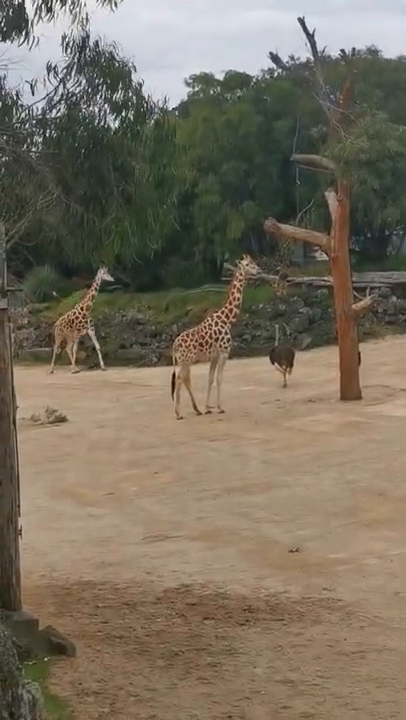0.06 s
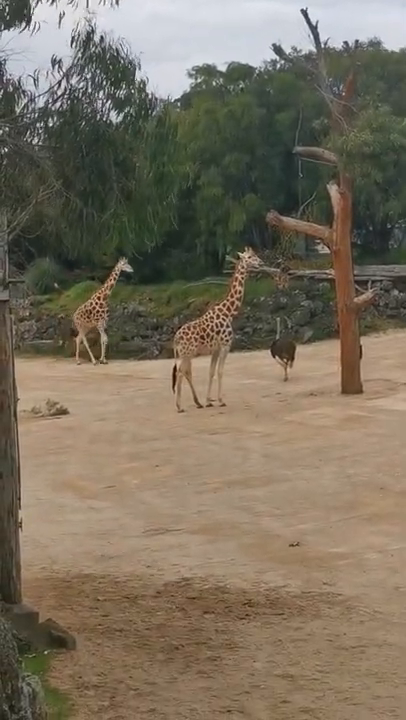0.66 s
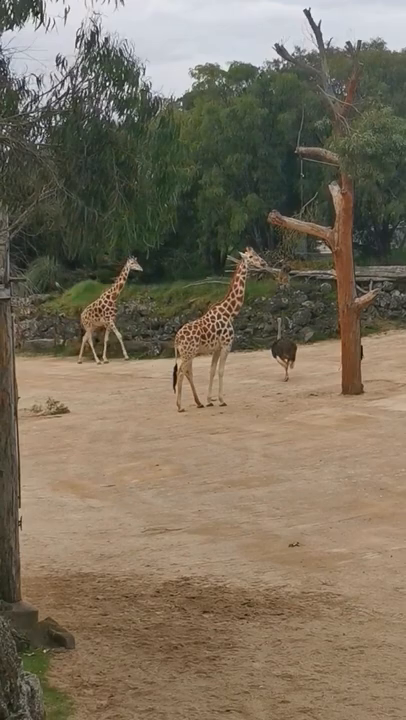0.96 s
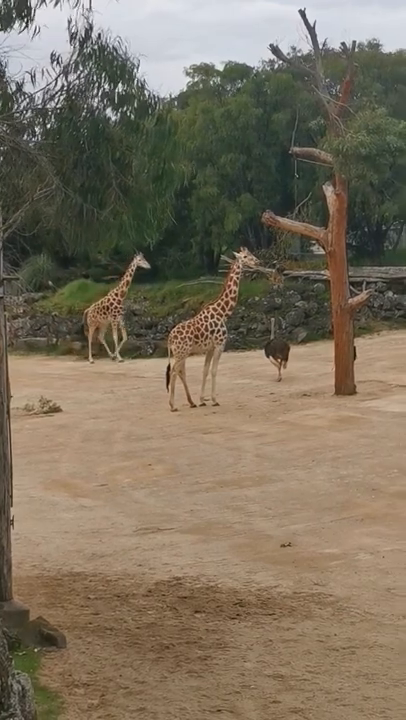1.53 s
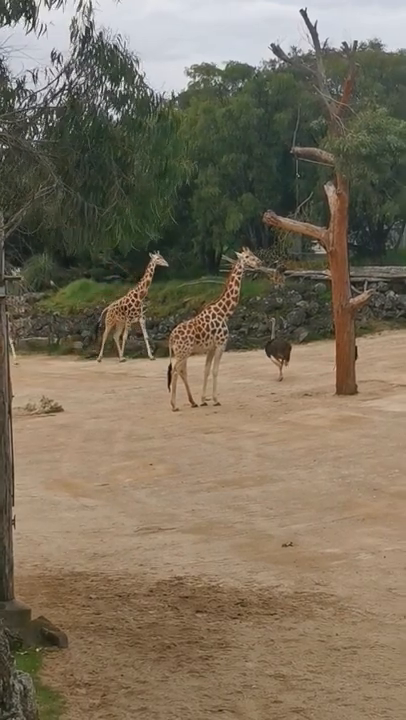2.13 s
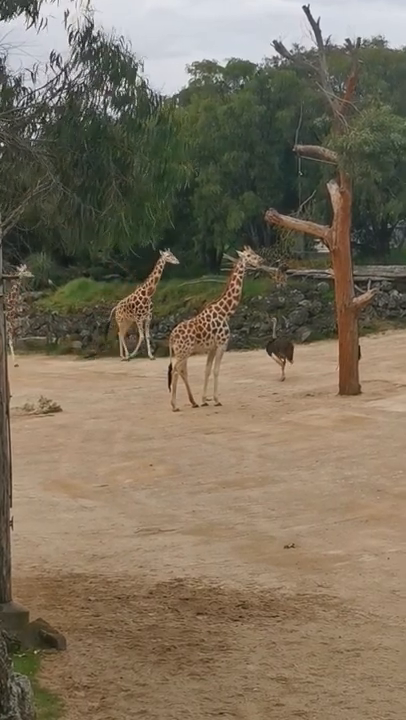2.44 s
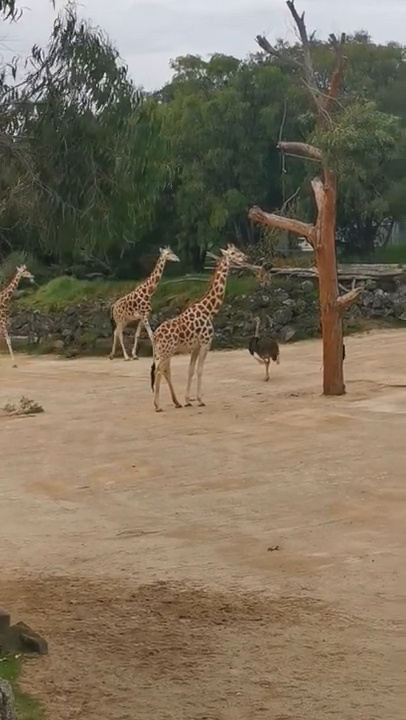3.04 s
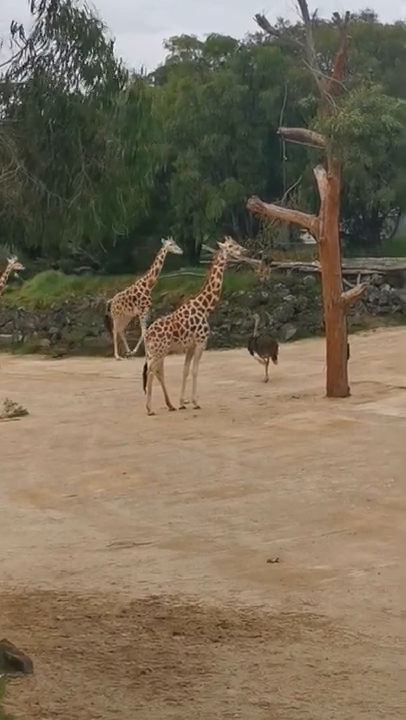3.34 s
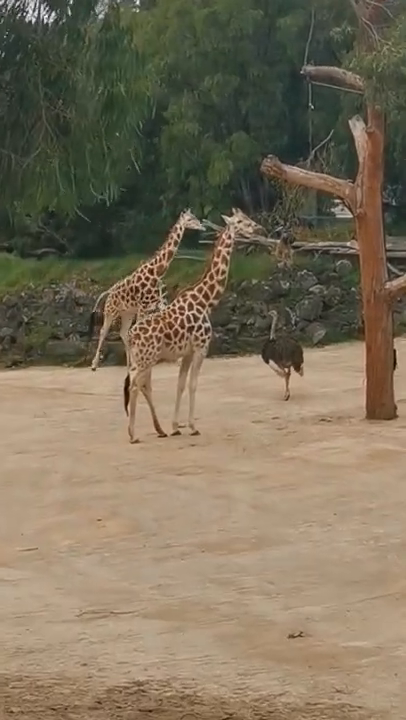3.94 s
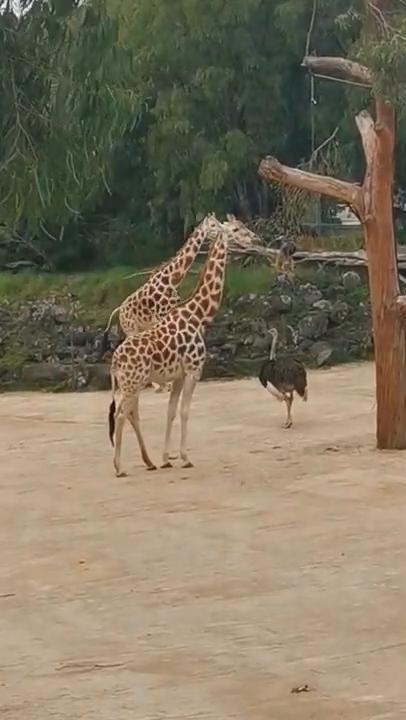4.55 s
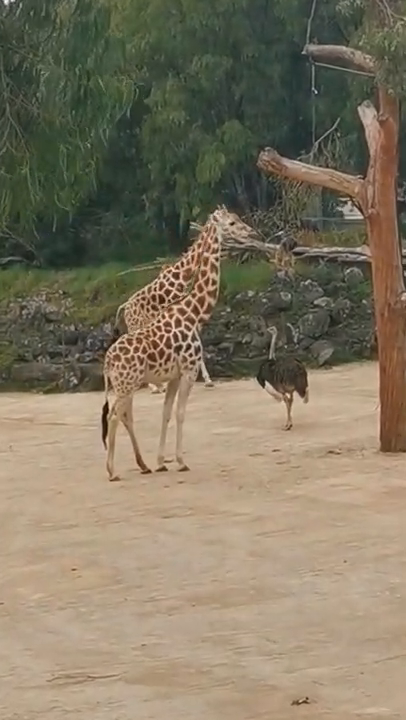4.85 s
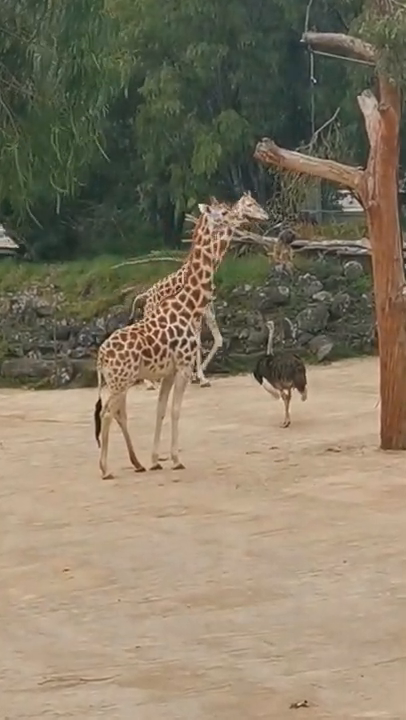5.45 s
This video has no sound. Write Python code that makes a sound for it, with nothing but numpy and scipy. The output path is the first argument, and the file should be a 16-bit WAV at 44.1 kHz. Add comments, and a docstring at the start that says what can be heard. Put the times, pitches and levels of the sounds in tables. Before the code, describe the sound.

A finch trills into a loud flourish and other birds answer, with a distant cooing dove and low outdoor rumble.

```python
"""Birds sing round an open animal paddock, over a low rumble, a faint machine hum and a soft high hiss.
First a dove coos far off and a distant bird repeats a rising whistle, with a few faint scuffs close by.
Then a finch runs through three trills into a loud flourish. Another bird answers with thin high notes
and low slurs; near the end a hidden bird chatters and the scuffs return. Each note is a gliding tone,
roughened by the bird's voice box and scattered into echoes by trunks and leaves."""
import sys
import numpy as np
from scipy import signal
from scipy.fft import rfft, irfft, next_fast_len
from scipy.io import wavfile
from scipy.ndimage import map_coordinates

SR = 44100
rng = np.random.default_rng(int(sys.argv[2]) if len(sys.argv) > 2 else 0)


def generate_wav(signal):
    """Clip the signal to [-1, 1] and save it as 16-bit WAV at the path in sys.argv[1]."""
    frames = np.transpose(np.atleast_2d(signal))
    scaled = np.clip(frames, -1, 1) * 32767
    pcm = np.round(scaled).astype(np.int16)
    wavfile.write(sys.argv[1], SR, pcm)


N = 250929
TIME = np.arange(N) / SR

# Tone colour of the rumble, the bass and the background hiss: (frequency [Hz], relative level [dB])
RUMBLE_COLOUR = [(25, -38.5), (60, -46), (100, -27), (220, 1), (350, 10.5), (650, 5), (1000, 2),
                 (1500, -13), (2500, -20.5), (6000, -30.5)]
BASS_COLOUR = [(25, -32), (60, -17), (100, -3), (170, 0), (300, -8), (1000, -50)]
HISS_COLOUR = [(100, -39), (600, -17), (1700, -4.5), (3000, 3), (4800, -0.5), (7000, -14), (14000, -41)]
# How each of them swells and fades: (time [s], relative level [dB])
RUMBLE_LEVELS = [(0, -67.5), (.9, -71.5), (1.5, -69.5), (2.3, -69), (2.8, -69), (3.5, -67), (4.3, -71),
                 (5.69, -69)]
BASS_LEVELS = [(0, -82), (1.1, -81.5), (1.55, -66.5), (1.8, -81), (2.8, -74.5), (3.05, -91), (3.5, -82),
               (5.1, -80.5), (5.69, -68.5)]
HISS_LEVELS = [(0, -77.5), (2.4, -69), (3.1, -60), (3.7, -57), (4.45, -71.5), (5.69, -57)]
# The machine's tones: (pitch [Hz], level [dB])
HUM_TONES = [(96.9, -94.5), (145.3, -102.5), (199.2, -87)]
# Scuffs close by: (time [s], centre frequency [Hz], width [Hz], fade time [s], level [dB])
NEAR_SCUFFS = [(0.064, 8700, 1200, 0.025, -68), (.46, 8000, 7000, 0.028, -80),
               (0.812, 2600, 4850, 0.027, -62.5), (1.082, 855, 895, 0.021, -57),
               (3.981, 10760, 4190, 0.23, -88), (4.147, 10800, 2900, 0.028, -71),
               (4.33, 10800, 4330, 0.024, -62.5), (4.898, 8300, 6070, 0.019, -55)]

# The dove's coos: (time [s], length [s], pitch [Hz], rise [share of pitch], level [dB])
DOVE_COOS = [(0.049, 0.18, 451.7, 0.063, -58), (0.278, 0.092, 443.4, -0.19, -59.5),
             (0.459, 0.19, 402, -0.15, -62), (0.67, 0.048, 362.4, -0.048, -70),
             (1.148, 0.21, 372.2, -0.0047, -63.5), (1.365, 0.2, 390.5, 0.063, -59),
             (1.923, 0.1, 433, 0.31, -59), (2.03, 0.2, 486.7, 0.12, -67.5),
             (2.376, 0.0963, 443.5, -0.28, -60.5), (2.631, 0.14, 444.6, -0.23, -61.5),
             (3.36, 0.12, 440.2, -0.12, -56), (3.73, 0.15, 374, -0.076, -69)]
# The far bird's rising whistles: (time [s], level [dB])
FAR_WHISTLES = [(.075, -86), (.24, -84.5), (0.411, -83), (0.582, -77), (0.758, -79), (0.94, -79.5),
                (1.116, -76.5), (1.303, -77.5), (1.503, -75.5), (1.712, -72.5)]

# A syllable is a tiny group of notes. The hidden bird has one, the finch the other five:
# (delay [s], length [s], start pitch [Hz], middle pitch [Hz], end pitch [Hz], level [dB], rasp [0-1])
CHATTER_NOTES = [(0, .032, 6400, 5850, 5200, -1.5, .6), (0, .038, 5200, 4500, 3900, -1, .7)]
ZIP_NOTES = [(-.032, .034, 2400, 2950, 3550, -11.5, .45), (-.036, .042, 4500, 5400, 7300, -4, .45),
             (-.01, .027, 3600, 5200, 7500, -.5, .4), (.002, .022, 3400, 5000, 6900, -.5, .4)]
CHIP_NOTES = [(-.003, .02, 6900, 5750, 4800, 0, .35), (.012, .024, 5750, 5400, 5050, -3, .35),
              (.008, .024, 4700, 4200, 3600, -5, .55)]
TEW_NOTES = [(0, .028, 4250, 3500, 2950, 0, .75)]
LOOP_NOTES = [(0, .026, 2450, 3050, 3800, .5, .55), (.016, .032, 3550, 4300, 5600, -1.5, .7),
              (.046, .03, 3950, 3920, 3800, -4.5, .25), (.066, .05, 3600, 2650, 1900, -10, .75)]
ARCH_NOTES = [(0, .016, 3400, 3980, 4300, 1.5, .2), (.011, .028, 4300, 4450, 4200, -1, .25),
              (.033, .045, 4150, 3600, 3100, -6.5, .3)]
# When each syllable is sung: (time [s], length [factor], pitch [factor], level [dB])
CHATTER_REPEATS = [(4.385, 0.78, 1, -53.5), (4.486, 1.1, 1, -54.5), (4.596, 0.72, 0.98, -49.5),
                   (4.699, 1.17, 0.95, -45), (4.814, 1.01, 0.95, -43.5), (4.914, 1, 0.96, -45),
                   (5.003, 1, 0.93, -45), (5.11, 1.04, 0.88, -48), (5.21, 1.25, 0.9, -45),
                   (5.309, 1.25, 0.75, -45.5)]
ZIP_REPEATS = [(1.644, 1.2, 0.96, -62.5), (1.754, 1.4, 1, -61.5), (1.841, 0.72, 1, -53),
               (1.952, 0.93, 1, -52.5), (2.051, 1.07, .98, -52)]
CHIP_REPEATS = [(2.12, 1.27, 0.98, -57), (2.205, 0.64, 0.96, -51.5), (2.284, 1.08, 1, -56),
                (2.375, 0.8, 0.99, -48.5), (2.454, 0.86, 0.92, -51.5)]
TEW_REPEATS = [(2.537, 0.83, 1.036, -44.5), (2.608, .95, 1.02, -46.5), (2.67, 0.81, 1.036, -45),
               (2.738, 0.78, 0.94, -50.5), (2.802, 1, .98, -50.5), (2.871, 0.94, 0.96, -50.5),
               (3.387, 0.94, 1.037, -40)]
LOOP_REPEATS = [(2.944, 0.97, 1, -41.5), (3.13, 0.88, 0.99, -42), (3.423, 0.65, 0.95, -42.5)]
ARCH_REPEATS = [(3.678, .95, 0.97, -36.5), (3.828, 1, 0.99, -47.5)]

# The answering bird's whistles:
# (time [s], length [s], pitch [Hz], rise [share of pitch], level [dB], rasp [0-1])
RASPY_WHISTLES = [(4.351, 0.11, 8040, -0.025, -41.5, 0.21), (4.448, 0.022, 7360, -0.13, -37, 0.43),
                  (4.477, 0.021, 6640, -.02, -37, 0.43), (4.561, 0.057, 8270, 0.02, -48, 0.27),
                  (4.604, 0.0327, 8165, -0.023, -39, 0.18), (4.941, 0.039, 6570, 0.032, -33, 0.27),
                  (5.082, 0.04, 8040, -0.021, -46, 0.35), (5.134, 0.037, 7940, 0.075, -43, 0.2),
                  (5.248, 0.032, 6770, 0.13, -38, 0.38), (5.306, 0.042, 7000, -0.04, -37, 0.17)]
PURE_WHISTLES = [(3.6, .45, 5160, -.014, -41.8, .4), (3.983, .045, 3416, -.01, -51, .2),
                 (5.532, .042, 4410, .03, -32.5, .04)]
# Its other calls, and the finch's harsh linking notes: (time [s], length [s], pitch [Hz], level [dB])
UPWARD_SCOOPS = [(4.346, 0.015, 7270, -42.5), (4.559, 0.02, 7370, -47.5), (4.947, 0.012, 6300, -46),
                 (5.074, 0.016, 7360, -47), (5.574, 0.027, 5700, -47)]
LOW_SLURS = [(4.027, 0.091, 2195, -63.5), (4.181, 0.078, 2014, -68), (5.296, 0.025, 2655, -48),
             (5.483, 0.0277, 2887, -46.5), (5.655, 0.034, 2917, -46)]
FALLING_FLICKS = [(2.891, 0.19, 6050, -64.5), (3.363, 0.033, 5850, -58), (4.004, 0.04, 6290, -56),
                  (4.724, 0.017, 6480, -41), (4.838, 0.015, 6570, -43), (5.184, 0.021, 6320, -40),
                  (5.668, .024, 5100, -38)]
SHORT_BUZZES = [(4.46, 0.037, 7900, -67), (5.4, 0.059, 3760, -40), (5.434, 0.073, 5950, -50),
                (5.575, 0.063, 4450, -45), (5.631, 0.047, 5875, -39)]
HIGH_WHEEZES = [(2.861, 0.068, 6830, -63.5), (3.038, 0.17, 7050, -59.5), (3.235, 0.078, 7050, -63),
                (3.385, 0.049, 6960, -57), (4.26, 0.2, 6460, -61.5)]
FINCH_LINKS = [(2.139, 0.026, 3000, -69), (2.84, 0.007, 4800, -56.5), (3.341, 0.011, 4900, -54),
               (3.509, 0.031, 3830, -45.5), (3.546, 0.021, 5380, -53.5), (3.566, 0.06, 4960, -46.5),
               (3.611, 0.046, 3700, -44), (3.651, 0.035, 3300, -40), (3.733, 0.09, 2730, -54)]
# Their shapes: (start pitch [share of middle pitch], end pitch [share of middle pitch], rasp [0-1])
SCOOP_SHAPE, SLUR_SHAPE, FLICK_SHAPE = (.82, 1.04, .3), (1.03, .93, .3), (1.17, .8, .7)
BUZZ_SHAPE, WHEEZE_SHAPE, LINK_SHAPE = (1.05, .98, .8), (1, 1, .35), (1.2, .92, .7)

# The finch starts harsh and grows pure: (time [s], relative hiss level [dB])
FINCH_HARSHNESS = [(1.63, -13), (1.8, -15), (2.05, -20), (2.4, -26), (2.56, -46), (3.7, -50)]
# Tone colour of that hiss: (frequency [Hz], relative level [dB])
FINCH_HISS_COLOUR = [(1000, -20), (4000, -6), (8500, 4), (10500, 3), (12500, -4), (15000, -9)]
# How squarely the finch faces the paddock: (time [s], relative level of the direct sound [dB])
FINCH_FACING = [(1.6, -2.5), (2.05, -2), (2.2, -5.5), (2.45, -5.5), (2.56, -3.2), (3.45, -3), (3.6, -4),
                (3.69, 2.5), (3.9, 4.5)]
# Where the finch is heard: (time [s], left minus right [dB])
FINCH_POSITION = [(1.9, -7), (2.6, -2), (3.3, -4), (3.7, -6.5)]


def gain(db):
    """Turn decibels into a number to multiply by."""
    return 10 ** (np.asarray(db) / 20)


def unit_level(x):
    """Scale a sound to an average strength (rms) of 1."""
    return x / np.sqrt(np.mean(x ** 2) + 1e-30)


def curve(rows):
    """Join (time, value) rows by straight lines."""
    return np.interp(TIME, *np.transpose(rows))


def add(track, start, x):
    """Mix x into the track from a start time in seconds."""
    i = max(int(start * SR), 0)
    track[i:i + len(x)] += x[:max(N - i, 0)]


def wobble(rate, size):
    """A smooth random wiggle, roughly 1 either way, that changes rate times a second."""
    points = rng.standard_normal(2048)
    return map_coordinates(points, [np.arange(size) * rate / SR], order=2, mode="wrap")


def band(x, hz, width_hz):
    """Keep the part of a sound near one frequency."""
    return signal.lfilter(*signal.iirpeak(min(hz, SR / 2.2), hz / width_hz, fs=SR), x)


def colour(x, points):
    """Turn the lows and highs up or down along (frequency, level) points."""
    hz, db = np.transpose(points)
    size = next_fast_len(N)
    frequencies = np.maximum(np.fft.rfftfreq(size, 1 / SR), 1)
    gains = gain(np.interp(np.log(frequencies), np.log(hz), db))
    return irfft(rfft(x, size) * gains, size)[..., :N]


def stereo(x, lag_ms, pan_db):
    """Place a sound: a positive lag delays the right side, a positive pan favours the left."""
    late = map_coordinates(x, [np.arange(N) - lag_ms * SR / 1000], order=3)
    return np.array([x * gain(pan_db / 2), late * gain(-pan_db / 2)])


def far_noise(tone_colour, side_db):
    """Noise from all round; the lower side_db is, the more alike left and right are in the bass."""
    shared, side = colour(rng.standard_normal((2, N)), tone_colour)
    side = colour(side, [(100, side_db), (500, side_db / 2), (1500, .033)])
    return unit_level(np.array([shared + side, shared - side]))


def rumble_and_hum():
    """A far rumble and its bass swell slowly while a machine's hum wavers."""
    rumble = far_noise(RUMBLE_COLOUR, side_db=-14) * gain(curve(RUMBLE_LEVELS) + 1.1 * wobble(27, N))
    bass = far_noise(BASS_COLOUR, side_db=-6) * gain(curve(BASS_LEVELS) - 2)
    hum = np.zeros(N)
    for hz, db in HUM_TONES:
        pitch = hz * (1 + .01 * wobble(8, N))
        strength = gain(db + 2.5 * wobble(5, N))
        hum += np.sqrt(2) * strength * np.sin(2 * np.pi * np.cumsum(pitch) / SR)
    return (rumble + bass + hum) * gain([[-1.7], [1.7]])  # louder on the right


def high_hiss():
    """A soft, high background hiss that swells with the finch's song and again at the end."""
    strength = gain(curve(HISS_LEVELS) + 1.2 * wobble(12, N))
    return far_noise(HISS_COLOUR, side_db=.5) * strength * gain([[-1.5], [1.5]])


def scuffs():
    """Dry rubs and rustles close by: short bursts of grainy noise."""
    track = np.zeros(N)
    t = TIME[:SR]
    for start, hz, width_hz, fade_s, db in NEAR_SCUFFS:
        noise = band(rng.standard_normal(len(t)), hz, width_hz)
        grit = unit_level(band(noise, hz, width_hz)) * gain(1.4 * wobble(107, len(t)))
        burst = np.exp(-t / fade_s) * (1 - np.exp(-t / .014)) ** 2
        add(track, start, gain(db) * grit * burst)
    return stereo(track, lag_ms=0, pan_db=-5.5)


def trees(x, direct_db, trunk_db, trunk_s, tail_db, tail_s, lag_ms, pan_db, spread):
    """Near trunks send back quick echoes; leaves add a soft tail that fades by 60 dB in tail_s."""
    t = TIME[:int(1.4 * SR)]
    size = (3, len(t))  # echoes from the bird's direction, the left and the right
    trunks = rng.standard_normal(size) * (rng.random(size) < 900 / SR)  # about 900 echoes a second
    trunks *= np.exp(-t / trunk_s) * np.minimum(t / trunk_s, 1)
    scatter = rng.standard_normal(size)
    lows = signal.sosfiltfilt(signal.butter(2, 4600, fs=SR, output="sos"), scatter)
    highs = scatter - lows
    # leaves and air swallow the highs sooner
    tail = lows * gain(-60 * t / tail_s) + highs * gain(-60 * t / (.58 * tail_s))
    tail *= 1 - np.exp(-t / .14)
    echoes = sum(gain(db) * part / np.linalg.norm(part, axis=1, keepdims=True)
                 for db, part in ((trunk_db, trunks), (tail_db, tail)))
    echoed = signal.fftconvolve(x[None], echoes, axes=1)[:, :N]
    from_bird = stereo(gain(direct_db) * x + echoed[0], lag_ms, pan_db)
    from_sides = spread * echoed[1:] * gain(np.vstack([pan_db, -pan_db]) / 2)
    return from_bird + from_sides


def note(length, pitches, rasp, buzz_hz, swing, overtone_db, edge, swell_db=0, wander=.0014):
    """A tone glides through three pitches; the bird's rasping voice box shakes its pitch and strength."""
    size = int(max(length, .005) * SR)
    progress = np.linspace(0, 1, size)
    glide = np.polyval(np.polyfit([0, .5, 1], pitches, 2), progress)
    buzz = np.sin(2 * np.pi * np.cumsum(buzz_hz * (1 + .233 * wobble(64.3, size))) / SR)
    shake = rasp * (1.2 * buzz + wobble(5 * buzz_hz, size))
    pitch = glide * (1 + swing * shake + wander * wobble(79.8, size))
    phase = 2 * np.pi * np.cumsum(pitch) / SR
    # air pressure builds more slowly than the voice box closes; edge is the share spent fading in
    ramp = np.clip(np.minimum(progress, 2 * (1 - progress)) / edge, 0, 1)
    flutter_db = 2.5 * shake + 1.8 * wobble(130, size)
    strength = np.sin(np.pi / 2 * ramp) ** 2 * gain(flutter_db + swell_db * (progress - .5))
    return np.sqrt(2) * strength * (np.sin(phase) + gain(overtone_db) * np.sin(2 * phase))


def sing(notes, wander=.00092, **voice):
    """One bird sings a list of notes, each at its own time."""
    track = np.zeros(N)
    for start, length, *pitches, db, rasp in notes:
        add(track, start, gain(db) * note(length, pitches, rasp, wander=wander, **voice))
    return track


def syllables(notes, repeats):
    """Repeat a syllable's notes, a little longer or shorter, higher or lower."""
    return [(start + delay * stretch, length * stretch,
             first * pitch, middle * pitch, last * pitch, db + note_db, rasp)
            for start, stretch, pitch, db in repeats
            for delay, length, first, middle, last, note_db, rasp in notes]


def shaped(shape, rows):
    """Notes of one kind: the same glide and rasp at any pitch."""
    first, last, rasp = shape
    return [(start, length, hz * first, hz, hz * last, db, rasp) for start, length, hz, db in rows]


def held(start, length, hz, rise, db, rasp, arch=0):
    """A held note that leans up or down; arch lowers both ends by a share of the pitch."""
    return start, length, hz * (1 - arch - rise / 2), hz, hz * (1 - arch + rise / 2), db, rasp


def dove():
    """Hoarse low coos, so far off that they are half echo."""
    coos = [held(*row, rasp=.26, arch=.041) for row in DOVE_COOS]
    voice = sing(coos, buzz_hz=32, swing=.15, overtone_db=-24, edge=.4)
    return trees(voice, direct_db=-2, trunk_db=-6, trunk_s=.03, tail_db=-8, tail_s=.65,
                 lag_ms=-.02, pan_db=-5, spread=.7)


def far_bird():
    """An upward whistle, five or six times a second, swelling towards its top."""
    pitches_hz = (3400, 4680, 5380)
    voice = np.zeros(N)
    for start, db in FAR_WHISTLES:
        length = .094 + .018 * start  # each lasts longer than the one before
        whistle = note(length, pitches_hz, rasp=.25, buzz_hz=150, swing=.04, overtone_db=-45,
                       edge=.08, swell_db=9.5)
        add(voice, start, gain(db) * whistle)
    return trees(voice, direct_db=5, trunk_db=-1, trunk_s=.012, tail_db=-2.5, tail_s=.5,
                 lag_ms=.041, pan_db=-4.5, spread=.85)


def hidden_bird():
    """Harsh chatter from deep in the trees, heard largely by its echoes."""
    chips = syllables(CHATTER_NOTES, CHATTER_REPEATS)
    voice = sing(chips, buzz_hz=170, swing=.08, overtone_db=-33, edge=.6)
    return trees(voice, direct_db=-4.5, trunk_db=-2.5, trunk_s=.018, tail_db=-3.5, tail_s=.95,
                 lag_ms=.07, pan_db=-5, spread=.8)


def answering_bird_raspy():
    """Raspy high whistles with quick scoops up and flicks down, low slurs, buzzes and wheezes."""
    notes = [held(*row) for row in RASPY_WHISTLES]
    notes += shaped(SCOOP_SHAPE, UPWARD_SCOOPS) + shaped(SLUR_SHAPE, LOW_SLURS)
    notes += shaped(FLICK_SHAPE, FALLING_FLICKS)
    notes += shaped(BUZZ_SHAPE, SHORT_BUZZES) + shaped(WHEEZE_SHAPE, HIGH_WHEEZES)
    voice = sing(notes, buzz_hz=155, swing=.028, overtone_db=-48, edge=.26, wander=.0055)
    return trees(voice, direct_db=0, trunk_db=-6, trunk_s=.022, tail_db=-12.5, tail_s=.68,
                 lag_ms=.076, pan_db=-5.5, spread=.8)


def answering_bird_pure():
    """The same bird's pure whistles and a clearer layer of its slurs, with only a slight quiver."""
    notes = [held(*row) for row in PURE_WHISTLES] + shaped(SLUR_SHAPE, LOW_SLURS)
    voice = sing(notes, buzz_hz=130, swing=.022, overtone_db=-56, edge=.16, wander=.0025)
    return trees(voice, direct_db=0, trunk_db=-8, trunk_s=.022, tail_db=-15.5, tail_s=.68,
                 lag_ms=.076, pan_db=-6, spread=.8)


def finch():
    """Three trills and a flourish, with air hissing through the harsh notes."""
    trills = syllables(ZIP_NOTES, ZIP_REPEATS) + syllables(CHIP_NOTES, CHIP_REPEATS)
    trills += syllables(TEW_NOTES, TEW_REPEATS)
    flourish = syllables(LOOP_NOTES, LOOP_REPEATS) + syllables(ARCH_NOTES, ARCH_REPEATS)
    links = shaped(LINK_SHAPE, FINCH_LINKS)
    voice = sing(trills + flourish + links, buzz_hz=190, swing=.055, overtone_db=-41, edge=.45)
    hiss = colour(voice * gain(curve(FINCH_HARSHNESS)) * rng.standard_normal(N), FINCH_HISS_COLOUR)
    direct_db = curve(FINCH_FACING) + 1.5  # as the bird turns, its voice rises out of the echoes
    return trees(voice + hiss, direct_db, trunk_db=-1.6, trunk_s=.016, tail_db=-5.3, tail_s=.9,
                 lag_ms=.045, pan_db=curve(FINCH_POSITION), spread=.85)


def scene():
    """All the birds over the background."""
    main_birds = finch() + answering_bird_pure() + answering_bird_raspy()
    distant_birds = hidden_bird() + far_bird() + dove()
    return main_birds + distant_birds + scuffs() + high_hiss() + rumble_and_hum()


def record(dry):
    """Cut away the very highest treble."""
    top_hz = 14950
    return signal.sosfilt(signal.ellip(8, .2, 70, top_hz, fs=SR, output="sos"), dry)


dry = scene()
out = record(dry)
generate_wav(out)
```